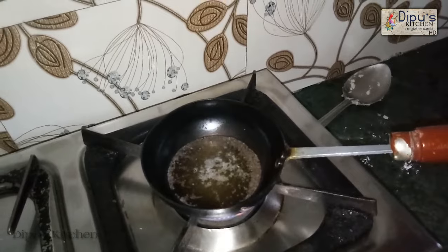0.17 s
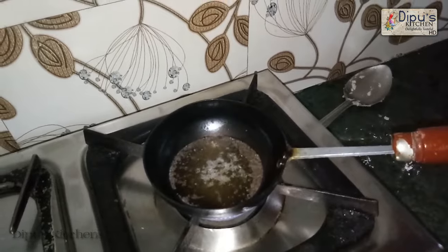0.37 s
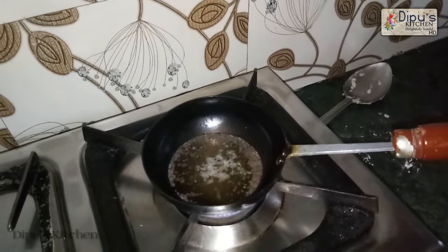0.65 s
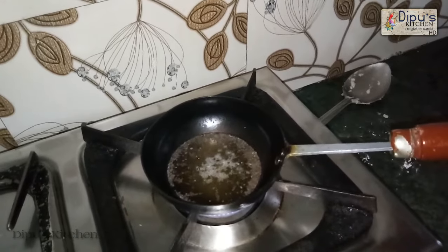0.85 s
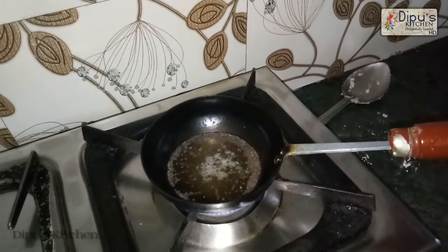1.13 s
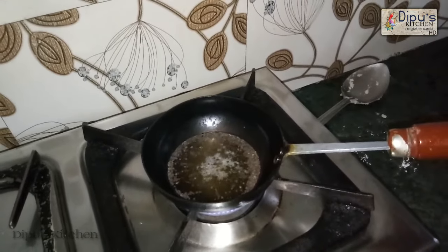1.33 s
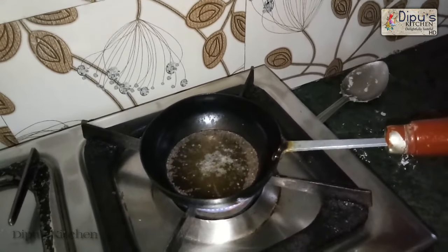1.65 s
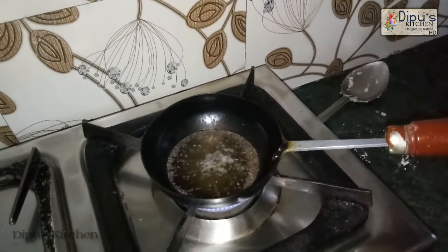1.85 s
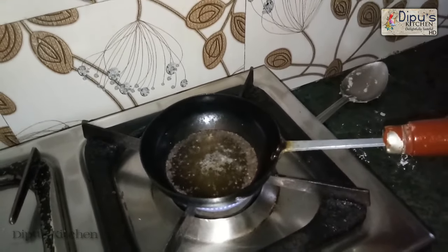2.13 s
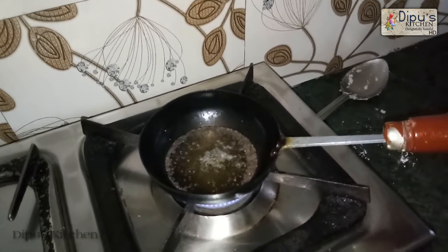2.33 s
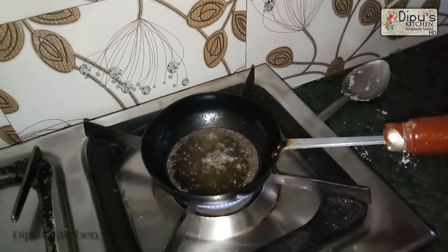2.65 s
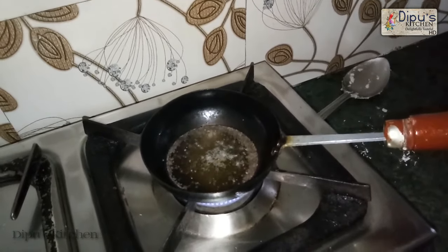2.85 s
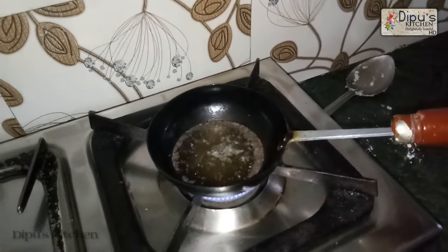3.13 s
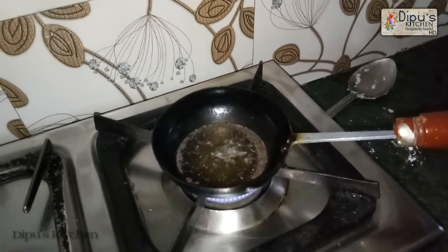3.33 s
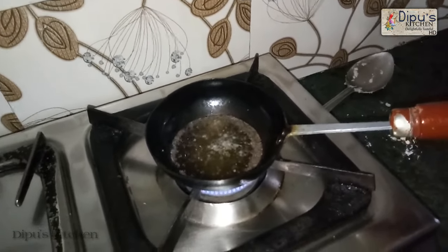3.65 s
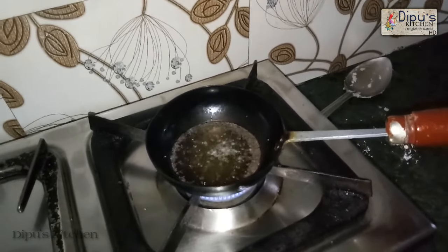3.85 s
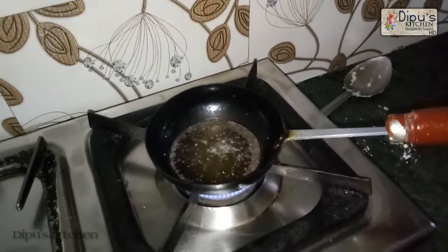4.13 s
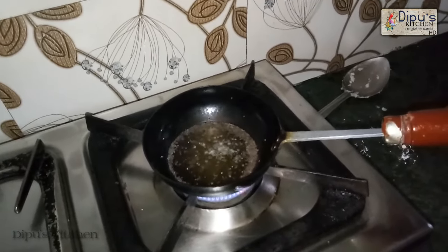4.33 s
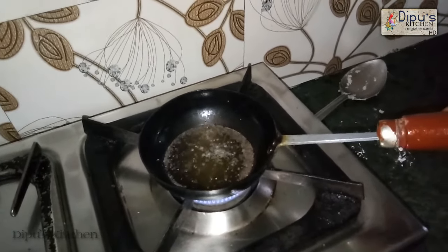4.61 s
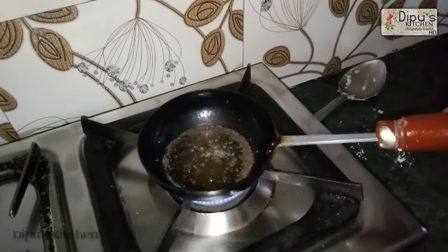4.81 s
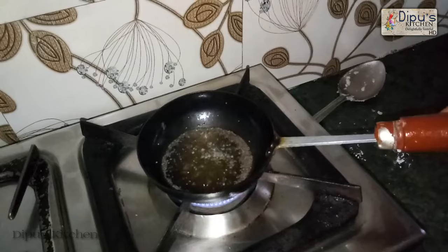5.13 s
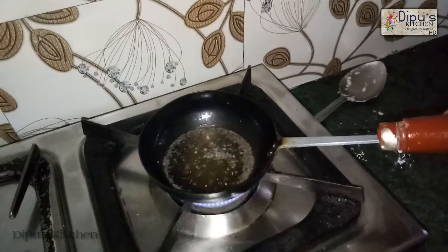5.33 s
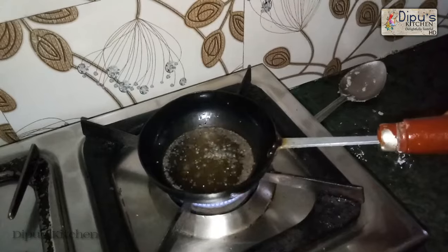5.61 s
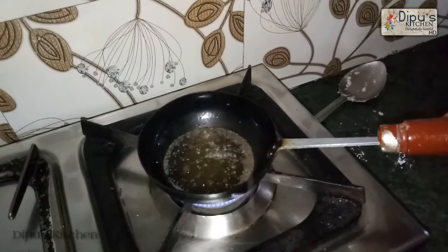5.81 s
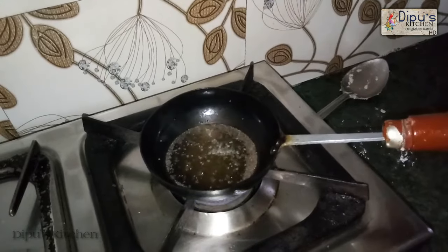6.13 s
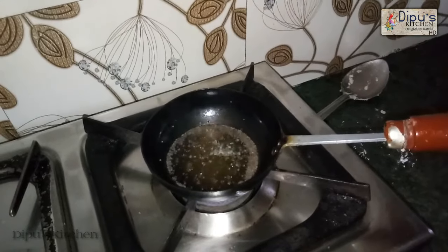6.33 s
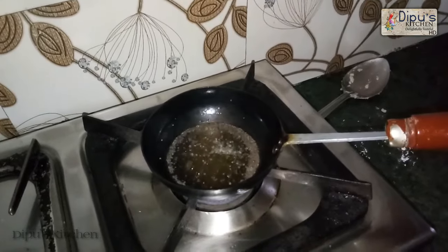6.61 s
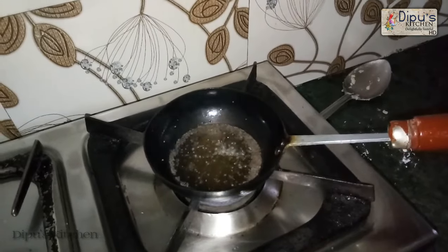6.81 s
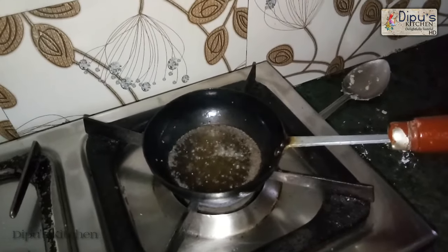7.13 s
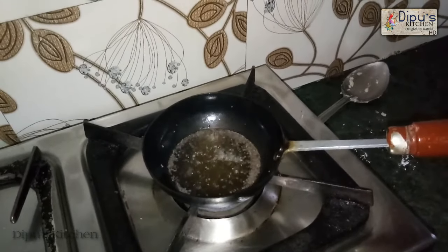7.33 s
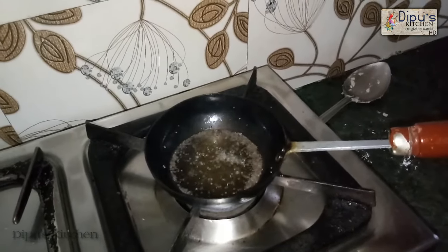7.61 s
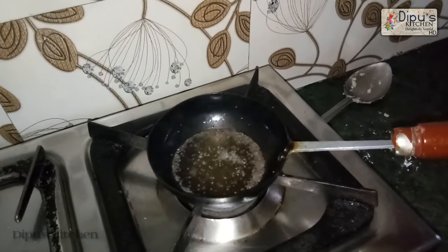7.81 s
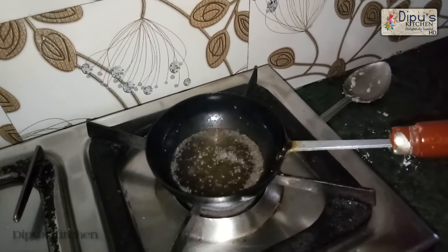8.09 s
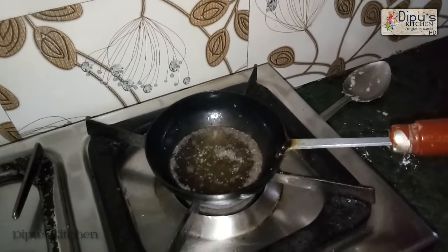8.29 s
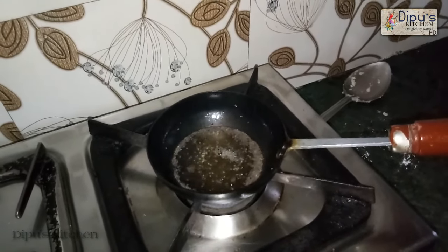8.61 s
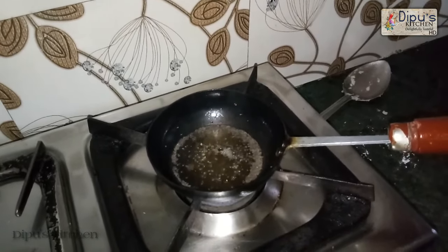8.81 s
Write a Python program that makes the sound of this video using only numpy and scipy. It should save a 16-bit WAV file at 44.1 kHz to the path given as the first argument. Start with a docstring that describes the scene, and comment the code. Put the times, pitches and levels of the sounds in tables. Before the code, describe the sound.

Small seeds pop and crackle sharply in hot oil in a small pan, sparse at first, then thick, over a faint hum in a kitchen.

```python
"""A hard-walled kitchen: small seeds burst in hot oil in a little iron pan over a gas flame.
Each pop is a ragged noise crack of under a millisecond, rung through thud, mid and treble resonances.
Distinct echoes off pan and walls and a bright tail of dying noise follow it.
Below lie a faint fizz of random ticks, thin hiss, a patchy low-mid wash and a wavering hum with rumble,
all of filtered noise; one short far whistle is a sine that blurs into narrow noise."""
import sys
import numpy as np
from scipy import signal
from scipy.fft import rfft, irfft
from scipy.io import wavfile

SR = 44100
rng = np.random.default_rng(int(sys.argv[2]) if len(sys.argv) > 2 else 0)


def store_wav(level_fs):
    """Save 16-bit WAV to argv[1]."""
    pcm = np.round(np.clip(np.atleast_2d(level_fs), -1, 1) * 32767)
    wavfile.write(sys.argv[1], SR, pcm.T.astype(np.int16))


N = 394694   # length in samples

# pops, some as close weak pairs; crack and tail levels vary separately:
# t/s, crack level/dB, low thud level/dB re crack, mid over treble/dB, room tail level/dB re crack
POPS = [(-0.0398, -18, -86, -12, -21.5), (0.2758, -25, -34, -11, -21.5), (0.315, -24, -22, -8, -19),
        (0.4762, -19, -27, -13.5, -19.5), (0.528, -32, -23.5, -8, -35), (0.6104, -22, -27, -6.5, -18.5),
        (0.6258, -33, -40, 0, -16), (0.7846, -21.5, -39, -14.5, -22), (0.863, -39, -28, 1, -16.5),
        (0.9463, -34.5, -46, 0.5, -12.5), (1.0763, -44.5, -20, -4, -21), (1.0895, -48, -30.5, -5, -4),
        (1.106, -29.5, -28, -5.5, -17.5), (1.1541, -30, -32, -2, -21), (1.172, -32.5, -19, 0, -19),
        (1.2142, -41, -26, -9, -19), (1.2185, -42, -33, -19, -22), (1.2954, -48, -42, -18, -33),
        (1.301, -43, -31, -3, -46), (1.3068, -43, -57, -5, -3.5), (1.3962, -20, -30, -8.5, -17.5),
        (1.485, -26, -21.5, -2, -21.5), (1.773, -33.5, -28, 5, -19), (1.8705, -22.5, -57, -10.5, -19),
        (1.918, -19.5, -37, -14.5, -23), (1.9992, -24, -46, -9.5, -17), (2.1466, -29.5, -36, -4.5, -20.5),
        (2.1778, -21.5, -28, -12.5, -24), (2.193, -35, -43, -10, -12), (2.234, -25, -38, -5, -19),
        (2.3073, -26, -19, -3, -17), (2.3292, -26, -23, -6.5, -22.5), (2.5318, -21.5, -27.5, -7.5, -18),
        (2.667, -21.5, -25, -11.5, -23.5), (2.8658, -47.5, -28, -8, -10.5), (2.9102, -34.5, -29, -9, -14.5),
        (2.9209, -34.5, -38, -13, -32.0), (2.9438, -36.5, -22, -4, -18), (3.116, -41, -20, -3, -15),
        (3.1706, -23.5, -41, -6.5, -18.5), (3.2505, -43, -20, -2, -20.5), (3.2638, -41, -23, 3, -37),
        (3.3844, -30.5, -37, -8, -20.5), (3.507, -27.5, -55, -11.5, -15), (3.5202, -28.5, -24, 1, -28),
        (3.587, -43, -42.5, -11, -10.5), (3.5965, -28.5, -25, -2, -15), (3.618, -20, -18.5, -3.5, -24.5),
        (3.6443, -35, -50, -13, -6.5), (3.693, -36, -40, -7, -16), (3.709, -46, -46, -15.5, -35),
        (3.7372, -53, -35.0, -14, -21), (3.8, -30, -56, -4, -19.5), (3.8795, -39, -7.5, -2, -32.0),
        (3.887, -38, -11, -11.5, -1.5), (3.9543, -30.5, -25, -2.5, -15), (3.9819, -24.5, -29, -11, -25),
        (4.115, -49, -46, 8, -14), (4.1405, -20.5, -28, -13, -23), (4.1835, -22.5, -12, -9, -20),
        (4.2538, -24, -45, -16, -21.5), (4.3145, -37.5, -32, -8, -9), (4.3267, -24.5, -34, -4.5, -22),
        (4.3287, -31, -25, -24, -28), (4.339, -30, -37, -11, -33), (4.3587, -40, -4.5, 6, -34),
        (4.368, -38.5, -9.5, -9, -4.5), (4.4375, -52, -24, -14, -34), (4.45, -47, -17, -8, -7),
        (4.476, -27, -27, -11, -22.5), (4.5565, -22, -22, -8, -22), (4.5639, -22, -32, -9, -17.5),
        (4.6786, -23, -17.5, -7, -28), (4.6843, -36, -32, -8, -11.5), (4.708, -31.5, -23, -12, -12.5),
        (4.786, -20.5, -17.5, -10.5, -28), (4.7941, -29, -56, -11, -33), (4.8091, -24, -19, -14, -16.5),
        (4.857, -29.5, -22, -0.5, -13), (4.8946, -37, -21, -4, -15), (4.921, -25.5, -30, -14, -20),
        (4.9332, -32.5, -50, 3, -13), (4.953, -32, -55, -23.5, -26), (5.0432, -17, -19, -10, -24.5),
        (5.0563, -39, -48, -12, -1), (5.147, -26.5, -21, -11, -18), (5.1564, -25.5, -25, -10, -28),
        (5.167, -21.5, -18.5, -7, -21.5), (5.1989, -29, -34, -4.5, -13.5), (5.234, -28, -26, -11, -18),
        (5.2465, -33, -37, 3, -14), (5.2803, -36.5, -31, -7, -23), (5.3363, -26, -33, -6, -20),
        (5.3466, -29.5, -24, 3, -21), (5.4143, -28.5, -24, -5.5, -18.5), (5.4779, -25.5, -28, -13, -20),
        (5.53, -38.5, -27, -12, -26), (5.6407, -23.5, -26, -9.5, -14.5), (5.7145, -40, -39, -23, -23),
        (5.7349, -23.5, -28, 3, -21.5), (5.785, -42, -7, -27, -1.5), (5.7976, -21, -40, -10, -25.5),
        (5.8215, -28, -12, -4.5, -17), (5.883, -37, -22, 3, -21), (5.9198, -29, -25, -7, -15),
        (5.9347, -24, -26, -10.5, -26), (5.9813, -25, -44, -12.5, -18.5), (6.171, -30.5, -59, -19, -16.5),
        (6.179, -31, -44, 1, -25), (6.1833, -33, -25, -3, -21), (6.225, -38, -22, 3, -22),
        (6.245, -27.5, -25, -2, -18.5), (6.2676, -29.5, -29, -0.5, -14.5), (6.318, -34, -45.0, -1, -31),
        (6.334, -44, -27, -18, -27), (6.344, -40.5, -18, -7, -7), (6.3623, -26, -61, -4.5, -16),
        (6.4106, -24, -28, -8, -18), (6.4996, -37.5, -10.5, 1, -43), (6.5077, -38.5, -8, -9, -6),
        (6.6008, -23.5, -25, -10.5, -18), (6.6108, -26.5, -55.0, -11, -20),
        (6.6724, -21, -23.5, -15.5, -15), (6.7912, -26, -38, -11.5, -18),
        (6.9004, -18.5, -28, -10.5, -20.5), (6.9069, -27.5, -42, 1, -20), (6.938, -55, -41, -9.5, -34),
        (6.9491, -46, -43, -14, 0), (6.9858, -23.5, -22, -9.5, -17), (7.0253, -25.5, -24, -10, -20.5),
        (7.0808, -24, -19.5, -9.5, -26), (7.1104, -28, -18, -6, -15.5), (7.1423, -28, -16, -8, -21.5),
        (7.1614, -41, -33, 4, -31), (7.1657, -41, -1.5, -8, 3), (7.3159, -22, -26.5, -9, -21.5),
        (7.385, -27, -22.5, -5.5, -19.5), (7.441, -46, -27, -4, -30), (7.446, -45, -25, -8, 5.5),
        (7.5248, -26, -35.5, -7.5, -18), (7.544, -24.5, -55.0, -7, -19), (7.5512, -27, -59, -9, -13),
        (7.6195, -33.5, -9, -3, -34), (7.626, -35, -8.5, -8, -7.5), (7.6542, -20.5, -22, -7, -16.5),
        (7.719, -37.5, -0.5, 6, -38), (7.729, -37.5, -8.0, -10, -6.5), (7.8157, -33, -55.0, -16, -20),
        (7.822, -25.5, -30, -3.5, -18), (7.8574, -43.5, -13, 0, -36), (7.8698, -42, -20, 2, -38),
        (7.8757, -34, -36, -14, -16), (7.885, -30, -21, -9, -16), (7.9134, -41, -11, -6, -18.5),
        (7.9241, -39, -5, -3, -8.5), (7.9404, -26.5, -18, -5.5, -21), (7.9828, -44, -57, -16, 5.5),
        (8.069, -30.5, -43, 11, -21), (8.0768, -20, -25, -8.5, -18), (8.1308, -25, -13.5, -3, -22.5),
        (8.1937, -21.5, -23, -12, -17.5), (8.2334, -27, -17, -3, -25), (8.2369, -24.5, -20.5, -4.5, -22),
        (8.2576, -33, -15, -1, -13.5), (8.3006, -32.5, -17, -10, -9.5), (8.306, -26.5, -23, -10, -31),
        (8.3625, -42.5, -23, -8, -1), (8.3654, -50, -35, -15, -24), (8.4199, -38, -6.5, 2, -34),
        (8.4275, -42, -3, -3.5, 1), (8.4562, -26, -43, -9, -32.0), (8.4625, -26.5, -53, -9, -15),
        (8.5896, -44, -34, -5, -26), (8.5975, -39, -8.5, 5, -20), (8.61, -39.5, -3, 3, -6),
        (8.6584, -24, -39, -10, -20.5), (8.699, -19, -29, -10.5, -21.5), (8.7124, -25.5, -46, -9, -16),
        (8.7965, -40, -22, -12, -28), (8.8107, -37.5, -49, -11.5, -5), (8.87, -38, -28, -5, -15.5),
        (8.8966, -39.5, -4.5, -1, -22), (8.9097, -32.5, -10.5, -6, -11), (8.9354, -32, -41, -5, -9)]
# resonances that colour the crack, levels relative within each part: f/Hz, width/Hz, level/dB
THUD_PEAKS = [(685, 51, 22.5), (2008, 290, 13.5)]
MID_PEAKS = [(3897, 730, -6.5), (5002, 343, -1.5), (6660, 1040, 1.5)]
TREBLE_PEAKS = [(10150, 1350, -3), (12350, 1900, -7), (14910, 710, 2), (16050, 900, -8.5)]
# gain on the treble peaks above 14 kHz over time: t/s, level/dB
TOP_GAIN = [(0, -7.5), (1.4, -1.5), (2.2, -1), (4.2, -0.5), (5.2, 0.5), (8.95, 0)]
# echoes off pan wall, stove and tiles, nominal: delay t/s, level/dB
ECHOES = [(.0018, 6.5), (.0065, -22), (0.01, -3.5), (0.014, -12)]
# kitchen tail by band, relative: low f/Hz, high f/Hz, t60/s, level/dB
TAIL = [(1584, 2800, 0.38, 9), (2470, 4780, 0.43, -1), (4630, 9500, 0.37, -0.5), (8600, 14700, 0.3, -1.5),
        (14100, 15800, 0.35, -3.5)]
# vigour of the frying, as sizzle level: t/s, level/dB
SIZZLE = [(0, -67.5), (.7, -74.5), (3, -70), (4.7, -53), (6.1, -67), (6.5, -59.5), (8.3, -57.5),
          (8.95, -58)]
# colour of the hiss: f/Hz, relative level per Hz/dB
HISS_SPECTRUM = [(1700, -32), (2400, -15), (3600, -4), (5200, -1.5), (7000, -9), (8000, -12), (10800, 5.5),
                 (13400, -8), (15100, 9.5), (15600, 8)]
# colour of the low-mid wash: f/Hz, relative level per Hz/dB
WASH_SPECTRUM = [(200, -5), (330, 8), (700, 0), (1300, 1.5), (1550, -11), (2000, -2.5), (2400, -20),
                 (3200, -16)]
# level of the hum before it wavers: t/s, level/dB
HUM = [(0, -61.5), (1, -65.5), (2.8, -62.5), (4.6, -65.5), (5.3, -58.5), (6.2, -67), (8.2, -62),
       (8.95, -70.5)]
# narrow bands of the hum: f/Hz, width/Hz, relative level/dB
HUM_PEAKS = [(99.6, 5.4, -4.5), (122.4, 14, -6.5), (148.9, 6.3, 3.5), (184, 8.7, -6.5)]
# colour of the continuous wavering low rumble: f/Hz, relative level per Hz/dB
RUMBLE_SPECTRUM = [(20, -1.5), (60, -1.5), (150, 0.5), (350, -10)]
# dull rumbles, as of the flame puffing or a hand shifting, before they waver:
# t/s, length/s, centre f/Hz, level/dB
PUFFS = [(5.148, 0.035, 114, -54), (5.215, 0.031, 98, -50.5), (5.268, 0.084, 123, -51.5),
         (5.313, 0.033, 120, -57), (5.387, 0.041, 160, -56.5), (6.41, 0.051, 403, -55),
         (6.56, 0.042, 165, -54.5)]

# cracks
LEAD, BURST_SAMPLES = 4096, 64   # samples: run-in for pops before the start, length of a crack's noise
CRACK_SAMPLES = 70   # energy of a unit crack
BURST_S, BODY_S = .00015, .0008   # decays; the low thud is driven by a longer splutter of noise
CRACK_RAGGED = 0.34   # noise after the first sharp edge of a crack
DEEP_FOLLOWS, DEEP_FULL_DB = 0.78, -16.5   # weak thuds lose deep part too, dB per dB below a full thud
# what the room hears
THUD_FOLLOWS, MID_FOLLOWS = .06, .65   # share of a crack's thud swing and mid swing
ROOM_RAGGED = .3   # raggedness of the crack sent to the room
USUAL_THUD_DB, USUAL_MID_DB = -28, -10
SPOTS, SPOT_SPREAD_DB = 8, 1.5   # places in the pan, and how their tails differ in colour
# oil
USUAL_SIZZLE_DB, FIZZ_PER_S = -57, 150   # mean tick rate at the usual sizzle
FIZZ_FOLLOWS, HISS_FOLLOWS = .4, 0.35   # share of the sizzle's swing that tick rate and hiss follow
FIZZ_SPREAD_DB, FIZZ_TOP = 7, 3.2   # spread of tick sizes, largest tick in spreads
HISS_DB, HISS_WAVER_DB = -59, 2.2   # hiss at the usual sizzle, and its waver
# background
WASH_DB, WASH_RISE_DB_PER_S = -71.5, 1.52   # wash at the start before dropouts, and its climb
WASH_RECOVER_S = 0.048   # how long a loud pop keeps the wash thin
PATCHY_BELOW_HZ = 3200
RUMBLE_DB, PUFF_WAVER_DB = -4.5, 2.5   # continuous rumble re hum curve, waver of the dull rumbles
# far whistle, clean at first, then blurred by its own echoes
WHISTLE_S, WHISTLE_DB, WHISTLE_RISE_S, WHISTLE_HOLD_S, WHISTLE_T60_S = 2.745, -60.5, .06, .1, 1.7
WHISTLE_HZ, WHISTLE_SAG_HZ, BLUR_WIDTH_HZ = 1357, 40, 140   # start pitch, fall per s, width of the blur
WHISTLE_WAVER_DB, WHISTLE_WAVER_HZ = 2.2, 3.5
# top end
TOP_EDGE_HZ, TOP_CRACKS_DB = 15450, -2   # above the edge only the direct cracks are kept, at this gain
CUTOFF_HZ = 16900


def from_db(db):
    """dB to gain."""
    return 10 ** (np.asarray(db) / 20)


def rms_one(x):
    """Scale to rms 1."""
    return x / np.sqrt(np.mean(x ** 2) + 1e-30)


def in_time(rows):
    """Second column of a curve table, one value per sample."""
    t, level = np.transpose(rows)
    return np.interp(np.arange(N) / SR, t, level)


def band(x, low_hz, high_hz, order=2):
    """Butterworth band-pass."""
    return signal.sosfilt(signal.butter(order, [low_hz, high_hz], "band", fs=SR, output="sos"), x)


def resonate(x, peaks):
    """Parallel two-pole resonances, signs alternating."""
    out = 0
    for k, (hz, width, level_db) in enumerate(peaks):
        r = np.exp(-np.pi * width / SR)
        a = [1, -2 * r * np.cos(2 * np.pi * hz / SR), r * r]
        b = [(1 - r * r) / 2, 0, (r * r - 1) / 2]
        out = out + (-1) ** k * from_db(level_db) * signal.lfilter(b, a, x)
    return out


def coloured(spectrum):
    """Noise with a given spectrum, all but silent outside it; rms 1."""
    hz = np.arange(1, N // 2 + 2) * SR / N
    at, level_db = np.transpose(spectrum)
    shape = from_db(np.interp(np.log(hz), np.log(at), level_db, left=-90, right=-90))
    return rms_one(irfft(rfft(rng.standard_normal(N)) * shape, N))


def drift(rate_hz):
    """Slow random wander, spread 1: noise through a double low-pass."""
    r = np.exp(-2 * np.pi * rate_hz / SR)
    return rms_one(signal.lfilter([1], [1, -2 * r, r * r], rng.standard_normal(N + SR))[SR:])


def pops():
    """Seeds burst as ragged cracks; the room hears them from all sides, so with an evener colour."""
    s, level_db, thud_db, mid_db, tail_db = np.transpose(POPS)[:, :, None]
    top_db = np.interp(s, *np.transpose(TOP_GAIN))
    edge_noise, room_noise, body_noise = rng.standard_normal((3, len(s), BURST_SAMPLES))
    n = np.arange(BURST_SAMPLES)
    decay = np.exp(-n / (BURST_S * SR))
    click = signal.unit_impulse(BURST_SAMPLES)
    at = np.round(s * SR).astype(int) + LEAD + n

    edge = CRACK_RAGGED * edge_noise * decay - click
    body = body_noise * np.exp(-n / (BODY_S * SR))
    direct, room = np.zeros((2, LEAD + N + BURST_SAMPLES))
    np.add.at(direct, at, from_db(level_db) * blend(cracks(edge, body, top_db), thud_db, mid_db))

    smooth = click + ROOM_RAGGED * room_noise * decay
    room_thud_db = -25.0 + THUD_FOLLOWS * (thud_db - USUAL_THUD_DB)
    room_mid_db = -8.5 + MID_FOLLOWS * (mid_db - USUAL_MID_DB)
    even = blend(cracks(smooth, smooth, top_db), room_thud_db, room_mid_db)
    sent = from_db(level_db + tail_db) * even
    for spot in range(SPOTS):   # each spot in the pan has its own path through the room
        train = np.zeros(len(direct))
        np.add.at(train, at[spot::SPOTS], sent[spot::SPOTS])
        room += signal.oaconvolve(train, kitchen_response())[:len(direct)]
    return direct[LEAD:LEAD + N], room[LEAD:LEAD + N]


def cracks(burst, body, top_db):
    """Bursts ring as deep thud, knock, mid and treble; thud with knock, mid, treble at equal energy."""
    deep, knock = (band(resonate(body, [peak]), 360, 8100) for peak in THUD_PEAKS)
    mid = band(resonate(burst, MID_PEAKS), 2610, 6010)
    top = from_db(top_db) * resonate(burst, TREBLE_PEAKS[2:])
    treble = band(resonate(burst, TREBLE_PEAKS[:2]) + top, 8100, 15900)

    def unit_gain(whole):
        return np.sqrt(CRACK_SAMPLES / np.sum(whole ** 2, axis=-1, keepdims=True))

    thud_gain = unit_gain(deep - knock)
    return deep * thud_gain, knock * thud_gain, mid * unit_gain(mid), treble * unit_gain(treble)


def blend(parts, thud_db, tilt_db):
    """Mix thud, mid and treble; the tilt shares the energy between mid and treble."""
    deep, knock, mid, treble = parts
    mid_share = 1 / (1 + from_db(-2 * tilt_db))
    thud = from_db(DEEP_FOLLOWS * np.minimum(thud_db - DEEP_FULL_DB, 0)) * deep - knock
    return from_db(thud_db) * thud + np.sqrt(mid_share) * mid + np.sqrt(1 - mid_share) * treble


def kitchen_response():
    """Noise dying by band, swelling in at the start, plus distinct echoes, thin in the bass."""
    t = np.arange(SR // 2) / SR
    tail = 0
    for low, high, t60, level_db in TAIL:
        noise = rms_one(band(rng.standard_normal(len(t)), low, high, order=4))
        fall_db = level_db + SPOT_SPREAD_DB * rng.standard_normal() - 60 * t / t60
        tail = tail + from_db(fall_db) * noise * np.sqrt(2 * (high - low) / SR)   # level per bandwidth
    echoes = np.zeros(len(t))
    for delay, level_db in ECHOES:
        echoes[round(delay * rng.uniform(.9, 1.1) * SR)] = from_db(level_db)
    echoes = band(echoes, 2400, 15700, order=4)
    swell = 1 - np.exp(-t / 0.00074)
    return echoes + tail * swell * from_db(2.5) / np.sqrt(CRACK_SAMPLES)


def fizz(sizzle_db):
    """Tiny steam bubbles tick at random in the oil, dull to bright, faster as the sizzle rises."""
    size_db = FIZZ_SPREAD_DB * np.minimum(rng.exponential(1, N), FIZZ_TOP)
    sizes = from_db(size_db) * rng.choice([-1, 1], N)
    per_s = FIZZ_PER_S * from_db(FIZZ_FOLLOWS * (sizzle_db - USUAL_SIZZLE_DB))
    ticks = sizes * (rng.random(N) < per_s / SR)
    bright = rng.random(N)
    dull_ring = resonate(ticks * (1 - bright) + 1e-18, MID_PEAKS)
    bright_ring = resonate(ticks * bright + 1e-18, TREBLE_PEAKS)
    return from_db(sizzle_db) * rms_one(band(dull_ring + bright_ring, 2500, 21000, order=4))


def hiss(sizzle_db):
    """Thin coloured noise that wavers and swells with the sizzle."""
    level_db = HISS_DB + HISS_FOLLOWS * (sizzle_db - USUAL_SIZZLE_DB) + HISS_WAVER_DB * drift(12.0)
    return from_db(level_db) * coloured(HISS_SPECTRUM)


def wash(direct, room):
    """Low-mid noise and low room tail; narrow bands drop out at random, more often after loud pops."""
    r = np.exp(-1 / (WASH_RECOVER_S * SR))
    power = signal.lfilter([1 - r], [1, -r], (direct + room) ** 2)
    loud_db = 10 * np.log10(power + 1e-9)
    push = 0.081 * np.clip(loud_db + 56.0, 0, 25)
    level_db = WASH_DB + WASH_RISE_DB_PER_S * np.arange(N) / SR
    low_mids = from_db(level_db) * coloured(WASH_SPECTRUM) + room
    edges = np.geomspace(200, PATCHY_BELOW_HZ, num=19)
    out = 0
    for k, (low, high) in enumerate(zip(edges, edges[1:])):
        gate_db = 450.0 * np.clip(drift(6.45) + 0.45 - push, -3, 0)   # fully open at 0
        out = out + (-1) ** k * from_db(gate_db) * band(low_mids, low, high, order=3)
    return out


def hum():
    """Noise in narrow wavering bands, a continuous wavering low rumble, and dull rumbles now and then."""
    t = np.arange(N) / SR
    level_db = in_time(HUM)
    lines = rms_one(band(resonate(rng.standard_normal(N), HUM_PEAKS), 64, 240))
    white = rng.standard_normal(N)
    puffs = 0
    for s, length, hz, puff_db in PUFFS:
        bump = np.exp(-.5 * ((t - s) / (length / 2)) ** 2)
        puffs = puffs + from_db(puff_db) * bump * rms_one(band(white, 0.79 * hz, 1.2 * hz, order=1))
    rumble = from_db(level_db + RUMBLE_DB + 3.8 * drift(8.0)) * coloured(RUMBLE_SPECTRUM)
    wavering_lines = from_db(level_db + 3.4 * drift(8.3)) * lines
    return wavering_lines + rumble + puffs * from_db(PUFF_WAVER_DB * drift(4.8))


def whistle():
    """A wavering sine, sagging slightly, gives way to dying noise sent twice through a resonance."""
    t = np.arange(N) / SR - WHISTLE_S
    pitch_hz = WHISTLE_HZ - WHISTLE_SAG_HZ * t + WHISTLE_WAVER_HZ * drift(16.0)
    clean = np.sqrt(2) * np.sin(2 * np.pi * np.cumsum(pitch_hz) / SR)
    peak = [(.98 * WHISTLE_HZ, BLUR_WIDTH_HZ, 0)]
    wide = rms_one(resonate(resonate(rng.standard_normal(N), peak), peak))
    after = np.maximum(t - WHISTLE_RISE_S - WHISTLE_HOLD_S, 0)
    blur = np.clip(0.05 + after / 0.06, 0, .8)   # noise share of the energy
    level_db = WHISTLE_DB - 60 * after / WHISTLE_T60_S + WHISTLE_WAVER_DB * drift(37.0)
    level = np.clip(t / WHISTLE_RISE_S, 0, 1) ** 2 * from_db(level_db)
    return level * (np.sqrt(1 - blur) * clean + np.sqrt(blur) * wide)


def scene():
    """Everything as one microphone hears it; above 15.45 kHz only the direct cracks are kept."""
    direct, room = pops()
    high_pass = signal.butter(3, PATCHY_BELOW_HZ, "high", fs=SR, output="sos")
    bright_room = signal.sosfilt(high_pass, room)   # the low part of the room is in the wash
    sizzle_db = in_time(SIZZLE)
    background = hum() + wash(direct, room) + fizz(sizzle_db) + hiss(sizzle_db) + whistle()
    below, above = (signal.ellip(6, .5, 30, TOP_EDGE_HZ, side, fs=SR, output="sos")
                    for side in ("low", "high"))
    main = signal.sosfiltfilt(below, direct + bright_room + background)
    top_cracks = from_db(TOP_CRACKS_DB) * signal.sosfiltfilt(above, direct)
    return (main + top_cracks)[None]


def record(dry):
    """A steep low-pass cuts the top, 60 dB down from the cutoff up."""
    return signal.sosfilt(signal.cheby2(22, 60, CUTOFF_HZ, fs=SR, output="sos"), dry)


dry = scene()
out = record(dry)
store_wav(out)
```